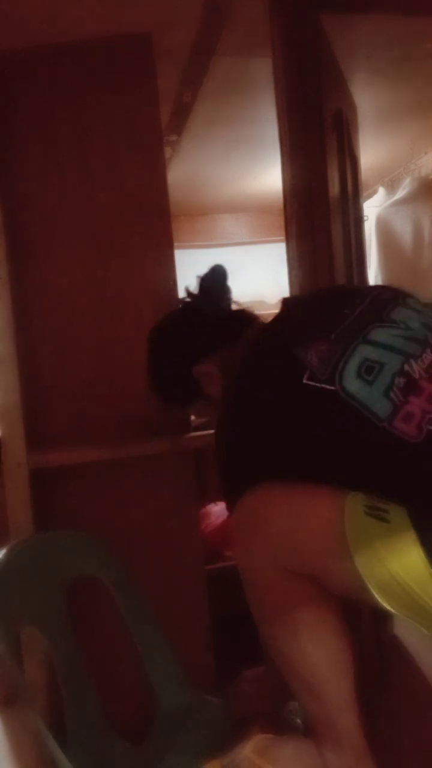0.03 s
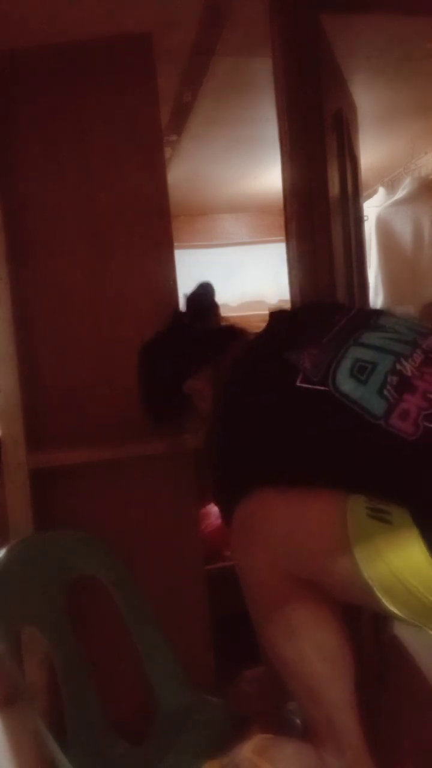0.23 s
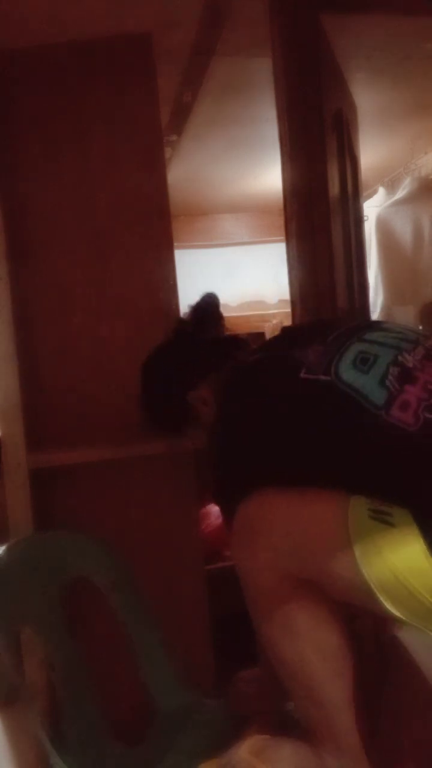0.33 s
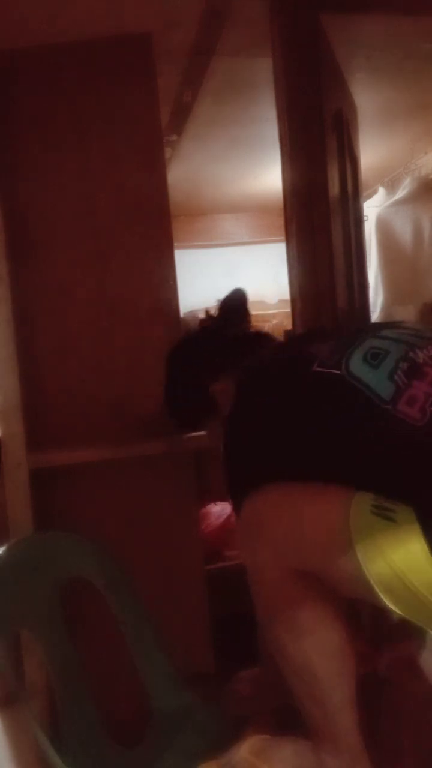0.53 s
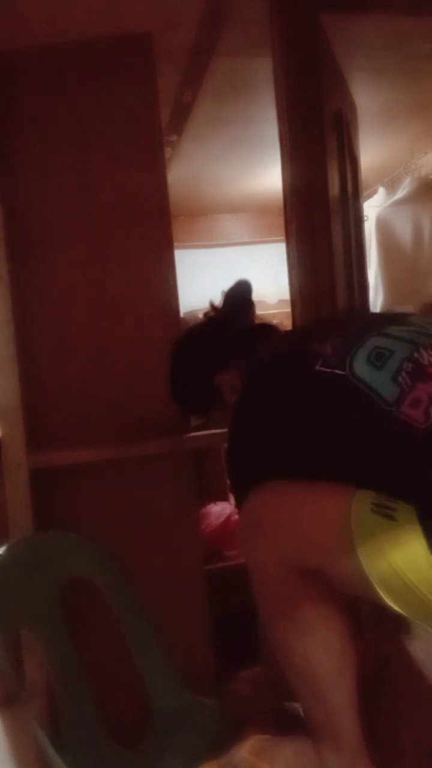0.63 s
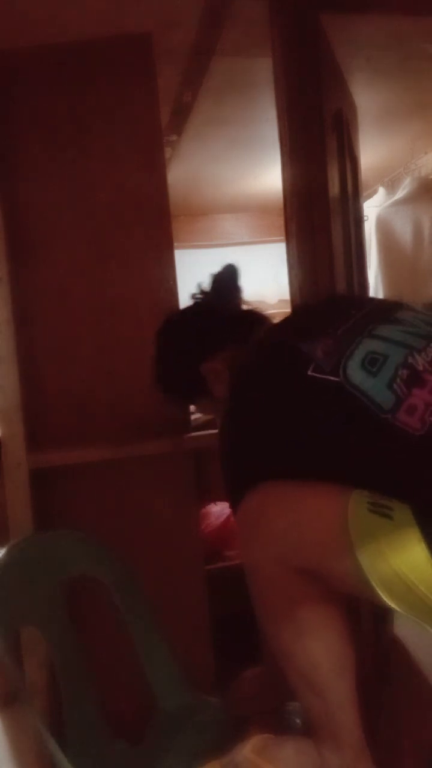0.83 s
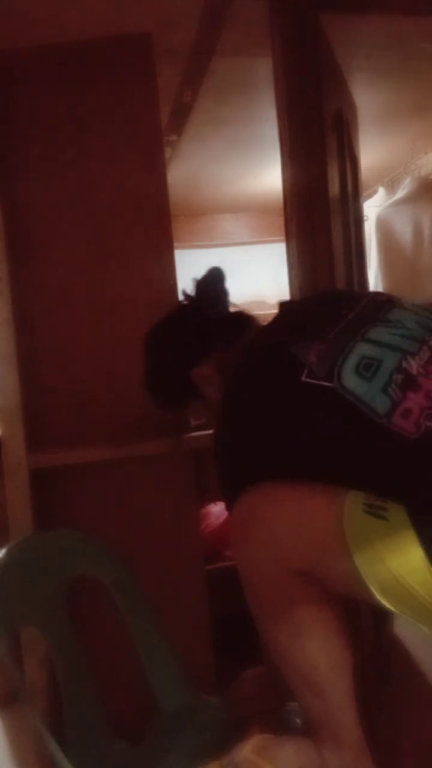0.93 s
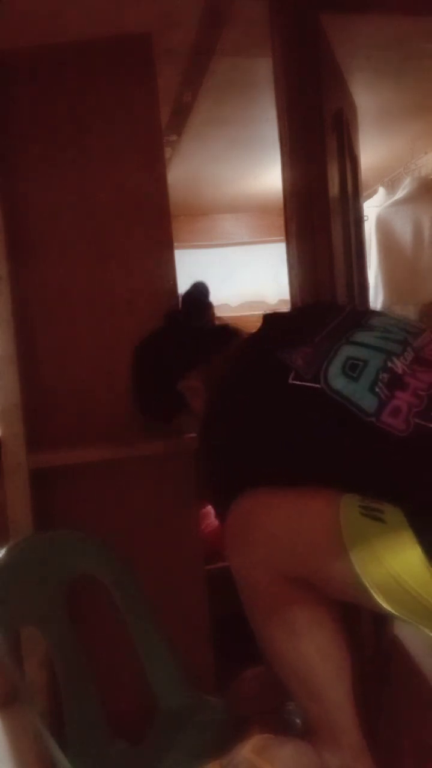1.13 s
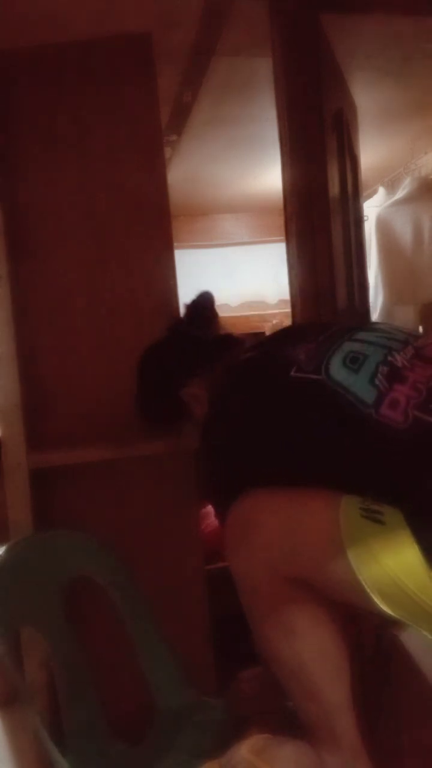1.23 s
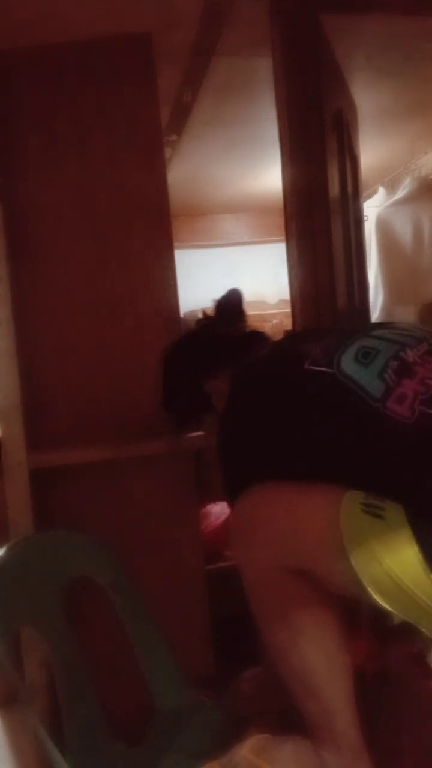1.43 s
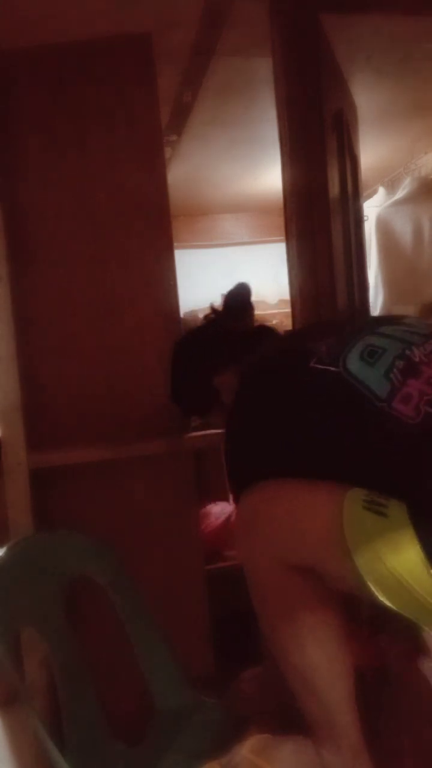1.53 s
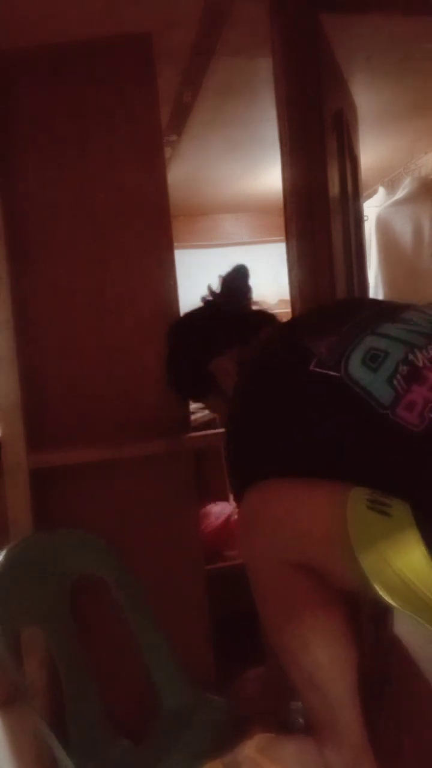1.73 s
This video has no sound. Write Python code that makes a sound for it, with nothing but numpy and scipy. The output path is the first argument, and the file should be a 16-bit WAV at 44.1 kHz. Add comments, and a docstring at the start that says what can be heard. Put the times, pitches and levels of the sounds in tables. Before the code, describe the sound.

A handsaw cuts a wooden board in uneven back-and-forth strokes inside a small, live room.

```python
"""A handsaw cuts a board in a small wooden room: hard biting pushes, with lighter strokes between.
The teeth scrape as hiss and dense clicks; their sparser catches drive the resonances of blade and board.
On light strokes the teeth skip evenly and squeak, in gliding harmonic stacks; hard pushes carry low,
falling tooth-rate thumps. A low hum and room air sit under it; a small microphone some steps away
hears much of the room."""
import sys
import numpy as np
from scipy import signal
from scipy.fft import rfft, irfft
from scipy.io import wavfile
from scipy.ndimage import uniform_filter1d

SR = 44100
rng = np.random.default_rng(int(sys.argv[2]) if len(sys.argv) > 2 else 0)


def bounce(signal):
    """Save signal as a 16-bit WAV file at the path given by the first command-line argument."""
    frames = np.transpose(np.atleast_2d(signal))
    limited = np.clip(frames, -1, 1)
    pcm = np.round(limited * 32767).astype(np.int16)
    wavfile.write(sys.argv[1], SR, pcm)


N = 79380  # samples, 1.8 s

# Colour of the room air. Each row: frequency in Hz, relative level in dB per Hz.
AIR_COLOUR = [(18, -53), (30, 18), (69, 7), (160, 1), (505, 1), (656, 4), (747, 3), (2130, 1), (3400, 0),
              (10500, -35), (15500, -41)]
AIR_DB = -46.5

# Bands of the low hum. Each row: centre in Hz, width in Hz, level in dB before the swell.
HUM_BANDS = [(120.2, 30, -49), (163, 2.8, -55), (240.7, 30, -61.5)]

# Slow swell of the hum. Each row: time in seconds, added level in dB.
HUM_SWELL = [(0, 2), (.7, 1.5), (1.45, 3), (1.6, 8), (1.8, 8)]

# How long the room rings. Each row: frequency in Hz, time to fall by 60 dB in seconds.
ROOM_DECAY = [(150, 0.28), (500, 0.22), (1500, 0.4), (3000, 0.39), (6000, 0.36), (10000, .25),
              (15000, 0.38)]
DIRECT_DB, ROOM_DB = -2.5, -4.5
TURNS_PER_S = 3  # how often the three random echo patterns take turns, for a smooth room tail

# Even tooth skipping, as squeaks or low thumps. Each row: start in seconds, length in seconds, first rate
# in Hz (teeth per second), last rate in Hz, ease of the glide (exponent), level in dB, overtones in dB,
# change of the overtones by the end in dB.
TOOTH_SKIPS = [(.305, .045, 270, 205, 1, -24, -25, 0), (.49, .03, 640, 690, 1.1, -38, -2, -.1),
               (.528, .052, 860, 990, 1.2, -26.5, 3, -14), (1.205, .04, 330, 280, 1.1, -27, -25, -.1),
               (1.322, .06, 2700, 1640, 1.7, -37, -16, 16), (1.403, .04, 660, 670, 1, -30, -8, 0),
               (1.476, .065, 735, 870, 1.8, -31, 1, -3), (1.772, .04, 640, 680, 1.1, -36, -4, -.1)]

# Tone of the skip overtones. Each row: frequency in Hz, relative level in dB.
SKIP_TONE = [(1200, -6), (1800, -4), (2600, 0), (3400, -2), (4500, -12), (6500, -25), (9000, -45),
             (11000, -90)]
SKIP_JITTER = 0.13  # share of the rate, before smoothing
SKIP_RISE_S, SKIP_FALL_S = 0.008, 0.01

# The saw strokes, one table per stroke. Each row: time in seconds, then relative levels in dB of
# the scrape, the blade ring, the board boom and the top fizz.
STROKES = [
    [(0.0, -33, -19, -38, -55), (0.008, -34, -58, -40, -62), (0.02, -45, -53, -36.5, -73.5),
     (0.038, -45.5, -63, -43.5, -69), (0.05, -47, -52, -47, -77)],
    [(0.155, -107, -91, -117, -102), (0.163, -45, -26, -30.5, -83), (0.177, -40, -33.5, -39, -67),
     (0.217, -35, -18, -33.5, -56.5), (0.231, -30.5, -14, -19.5, -56), (0.253, -31, -4.5, -20, -56),
     (0.303, -27, -16.5, -23, -48.5), (0.309, -32, -13, -18.5, -56), (0.341, -62, -31, -32, -66),
     (0.37, -52, -43, -27.5, -77)],
    [(0.483, -66, -45, -36, -102), (0.491, -40, -28, -41, -88), (0.503, -39.5, -16.5, -26.5, -78),
     (0.519, -48.5, -30, -54, -74), (0.539, -31.5, -26, -64, -74), (0.575, -72, -64, -70, -73),
     (0.585, -61, -53, -72, -84)],
    [(0.748, -50, -46, -55, -92), (0.754, -45, -28, -39, -83), (0.77, -47, -28, -30, -67),
     (0.784, -35, -50, -53, -63), (0.856, -40.5, -31, -37, -56), (0.866, -33.5, -33.5, -53, -57),
     (0.888, -35, -28.5, -48, -57.5), (0.972, -47, -45, -38, -77), (0.98, -58, -60, -38.5, -76)],
    [(1.05, -76, -56.5, -57, -105), (1.064, -44, -30, -74, -106), (1.078, -65, -47, -69, -105),
     (1.096, -40.5, -22.5, -31.5, -76), (1.124, -32.5, -34, -34.5, -56), (1.146, -37.5, -14.5, -41.5, -56),
     (1.158, -25, -17.5, -24, -56), (1.174, -36, -7.5, -24.5, -50.5), (1.218, -27, -17.5, -20.5, -52.5),
     (1.28, -60.5, -36.5, -46.5, -75)],
    [(1.31, -46, -60, -45, -71), (1.378, -46.5, -42, -70, -62), (1.4, -48, -39, -40, -76),
     (1.414, -34.5, -27, -51, -64), (1.438, -33, -23.5, -33.5, -66), (1.468, -56, -56, -52, -78),
     (1.478, -29, -32, -53, -75), (1.498, -35.5, -48, -42, -63), (1.534, -49, -50, -48, -63),
     (1.56, -65, -42, -39, -73)],
    [(1.765, -46, -65, -76, -80), (1.773, -42, -24.5, -23.5, -64), (1.789, -40, -42, -38, -60),
     (1.8, -30.5, -32, -27, -62)],
]
LIFT_S = 0.006  # fade just before and just after each stroke

# Blade resonances. Each row: frequency in Hz, width in Hz, relative level in dB.
BLADE_MODES = [(935, 12, -25.5), (1020, 24, -42.5), (1284, 34.8, 10.5), (1356.5, 57, 14.5),
               (1562, 90, 18.5), (1598, 74, 6), (1771, 17, 7), (1840, 32, -32), (2020, 35, -25.5),
               (2068, 81, 12.5), (2300, 60, -31), (2640, 120, -37.5), (3130, 77, -30)]

# Board resonances. Each row: frequency in Hz, width in Hz, relative level in dB.
BOARD_MODES = [(162, 21, -32.5), (223, 8.3, -8.5), (268, 87, 3), (379, 167, 3.5), (450, 75, -3),
               (518.4, 60, -0.5), (644.7, 16.5, 3), (847, 29, -3.5)]
BLADE_DB, BOARD_DB = -6, -1  # added to the stroke levels
CATCHES_PER_S, CATCH_SPREAD_DB = 1100, 4

# The hardest catches of a tooth. Each row: time in seconds, size in dB over the rms of the catches.
SNAGS = [(0.161, 29), (.283, 31.5), (.297, 24.5), (0.894, 29), (1.168, 31.5), (1.178, 31), (1.434, 29)]

# Rasp of the teeth. Each row: frequency in Hz, relative level in dB per Hz.
RASP_COLOUR = [(70, -60.5), (120, -13.5), (370, -19), (1000, 1.5), (1300, 0), (2100, 1.5), (2800, -2),
               (3500, -7), (4500, -14.5), (9000, -41), (11700, -67)]

# Fine fizz on top. Each row: frequency in Hz, relative level in dB per Hz.
FIZZ_COLOUR = [(3530, -24), (6000, -3.5), (8440, -7), (10000, -13.5), (12200, -17.5), (15500, -8.5)]
RASP_DB, FIZZ_DB = 7, 3  # added to the stroke levels
TEETH_PER_S, TOOTH_SPREAD_DB = 3000, 3.5
HISS_SHARE = 0.75  # the rest of the scrape is clicks

BASS_CUT_HZ, EDGE_HZ = 123, 15520  # lower and upper limits of the microphone sound


def amp(db):
    """Turns dB into gain."""
    return 10 ** (np.asarray(db) / 20)


def evened(x):
    """Scales a signal to rms 1."""
    return x / np.sqrt(np.mean(x ** 2) + 1e-20)


def read(points, hz):
    """Reads a curve on a log-frequency axis."""
    f, value = np.transpose(points)
    return np.interp(np.log(hz + 1), np.log(f + 1), value)


def colour(x, points):
    """Filters a signal by a spectrum in dB."""
    gain = amp(read(points, np.fft.rfftfreq(len(x), 1 / SR)))
    return irfft(rfft(x) * gain, len(x))


def ring(x, hz, width):
    """Passes a signal through one resonance with a peak gain near 1."""
    pole = np.exp((2j * np.pi * hz - np.pi * width) / SR)
    return 2 * signal.lfilter([1 - abs(pole)], [1, -pole], x).real


def resonance(x, hz, width):
    """Two resonances in a row, the second three times as wide, for steeper skirts."""
    return ring(ring(x, hz, width), hz, 3 * width)


def stroke_level(column):
    """Gain over time from one column of the strokes, silent between them."""
    t = np.arange(N) / SR
    gain = np.zeros(N)
    for rows in map(np.array, STROKES):
        start, end = rows[0, 0], rows[-1, 0]
        edge = np.clip(np.minimum(t - start + LIFT_S, end - t + LIFT_S) / LIFT_S, 0, 1)
        gain += edge * amp(np.interp(t, rows[:, 0], rows[:, column]))
    return gain


def clicks(per_s, spread_db):
    """Random clicks of either sign at rms 1; a few are large."""
    hit = rng.random(N) < per_s / SR
    size = np.minimum(rng.exponential(1, N), 4)
    sign = rng.choice([-1., 1.], N)
    return evened(hit * sign * amp(spread_db * size))


def background():
    """Coloured noise for the room air, and narrow noise bands that waver as a low hum."""
    hum = np.zeros(N)
    for hz, width, db in HUM_BANDS:
        hum += amp(db) * evened(resonance(rng.standard_normal(N), hz, width))
    swell = amp(np.interp(np.arange(N) / SR, *np.transpose(HUM_SWELL)))
    air = evened(colour(rng.standard_normal(N), AIR_COLOUR))
    return swell * hum + amp(AIR_DB) * air


def room(x):
    """Sparse echoes of random sign, each band dying at its own speed; three patterns take turns."""
    out = np.zeros(N)
    turn = 2 * np.pi * TURNS_PER_S * np.arange(N) / SR
    for k in range(3):
        taps = np.zeros(SR)
        at = np.arange(200, SR - 20, 20)  # one echo in every 20 samples
        taps[at + rng.integers(0, 20, len(at))] = rng.choice([-1., 1.], len(at))
        hz, t, bands = signal.stft(taps, SR, nperseg=256)
        decay = amp(-60 * t / read(ROOM_DECAY, hz)[:, None])
        tail = signal.istft(bands * decay, SR, nperseg=256)[1]
        # the squares of the three windows add up to 1
        window = np.sqrt(2 / 3) * np.cos(turn / 2 - k * np.pi / 3)
        out += signal.fftconvolve(x * window, tail / np.linalg.norm(tail))[:N]
    return out


def tooth_skip(start, length, from_hz, to_hz, ease, db, over_db, fade_db):
    """Evenly spaced tooth slips: a stack of harmonics whose rate glides up or down."""
    t = np.arange(N) / SR - start
    progress = np.clip(t / length, 0, 1)
    wobble = 1 + SKIP_JITTER * uniform_filter1d(rng.standard_normal(N), size=150)
    glide = 1 - (1 - progress) ** ease
    rate = (from_hz + (to_hz - from_hz) * glide) * wobble
    phase = 2 * np.pi * np.cumsum(rate) / SR
    overtones = sum(amp(read(SKIP_TONE, k * rate)) * np.cos(k * phase) for k in range(2, 12))
    rise, fall = t / SKIP_RISE_S, (length - t) / SKIP_FALL_S + 1  # the fall follows the length
    shape = np.clip(np.minimum(rise, fall), 0, 1) ** 2
    return amp(db) * shape * (np.cos(phase) + amp(over_db + fade_db * progress) * overtones)


def struck(modes, column, db):
    """Teeth catching in the kerf ring a set of modes, as hard as the stroke bites."""
    catches = clicks(CATCHES_PER_S, CATCH_SPREAD_DB)
    for s, snag_db in SNAGS:
        catches[round(s * SR)] += amp(snag_db)

    def body(x):
        """All modes together, balanced so that wide ones are not louder."""
        return sum(amp(d) * resonance(x, hz, width) / np.sqrt(width) for hz, width, d in modes)

    return amp(db) * body(catches * stroke_level(column)) / np.std(body(catches))


def scrape():
    """Teeth tearing fibres: dense clicks in hiss, coloured as a rasp and a fine top fizz."""
    hiss = rng.standard_normal(N)
    teeth = clicks(TEETH_PER_S, TOOTH_SPREAD_DB)
    tearing = HISS_SHARE * hiss + (1 - HISS_SHARE) * teeth
    rasp = amp(RASP_DB) * stroke_level(1) * evened(colour(tearing, RASP_COLOUR))
    fizz = amp(FIZZ_DB) * stroke_level(4) * evened(colour(tearing, FIZZ_COLOUR))
    return rasp + fizz


def scene():
    """The saw heard directly and through the room, over the background."""
    blade = struck(BLADE_MODES, column=2, db=BLADE_DB)
    board = struck(BOARD_MODES, column=3, db=BOARD_DB)
    skips = sum(tooth_skip(*row) for row in TOOTH_SKIPS)
    saw = scrape() + blade + board + skips
    return (amp(DIRECT_DB) * saw + amp(ROOM_DB) * room(saw) + background())[None]


def record(dry):
    """A small microphone without deep bass, then a steep cut of the highest treble."""
    bass_cut = signal.butter(2, BASS_CUT_HZ, "high", fs=SR, output="sos")
    thin = signal.sosfilt(bass_cut, dry)
    treble_cut = signal.firwin(1501, EDGE_HZ, window=("kaiser", 9), fs=SR)
    return signal.oaconvolve(thin, treble_cut[None], "same")


dry = scene()
out = record(dry)
bounce(out)
```